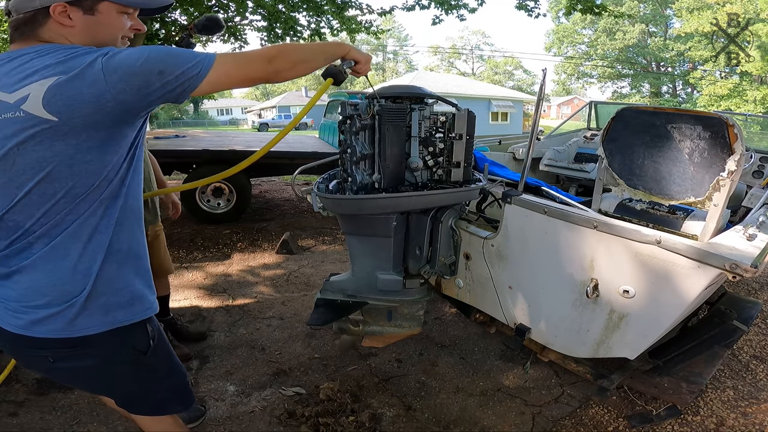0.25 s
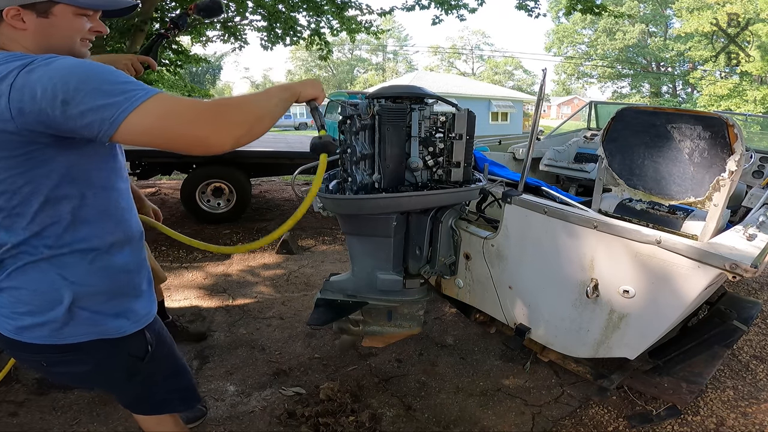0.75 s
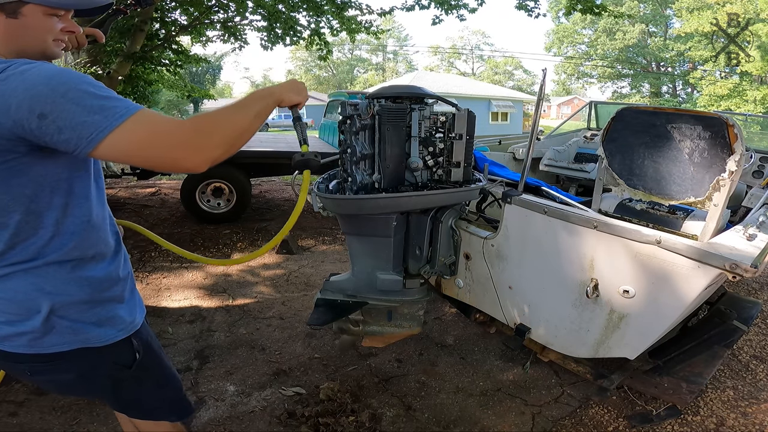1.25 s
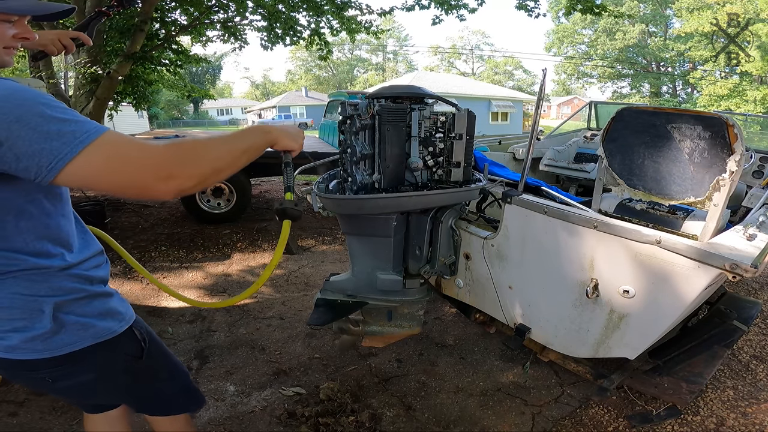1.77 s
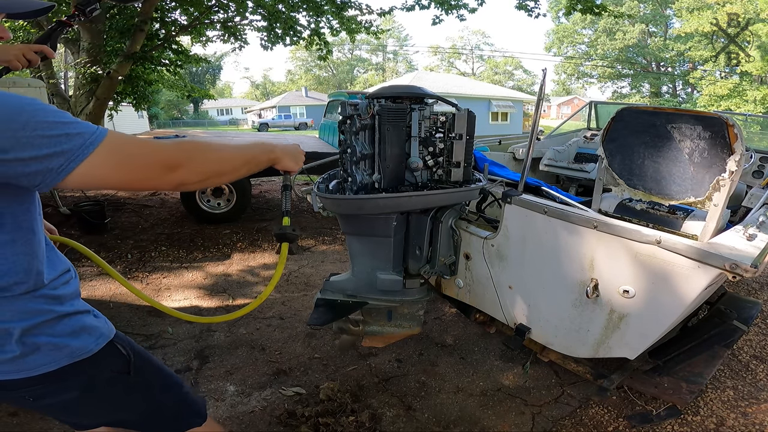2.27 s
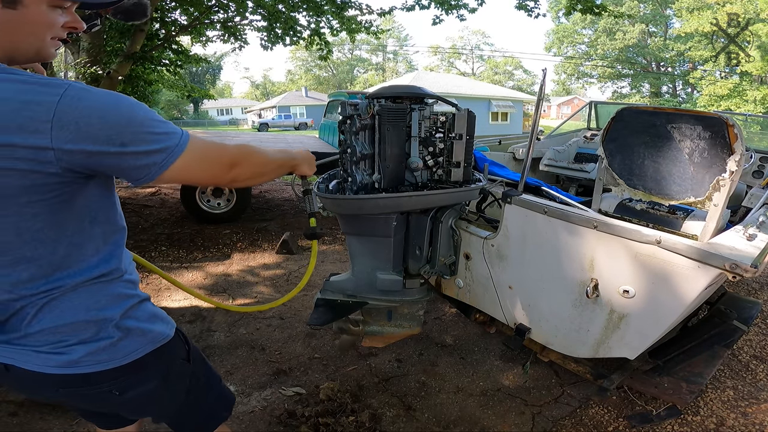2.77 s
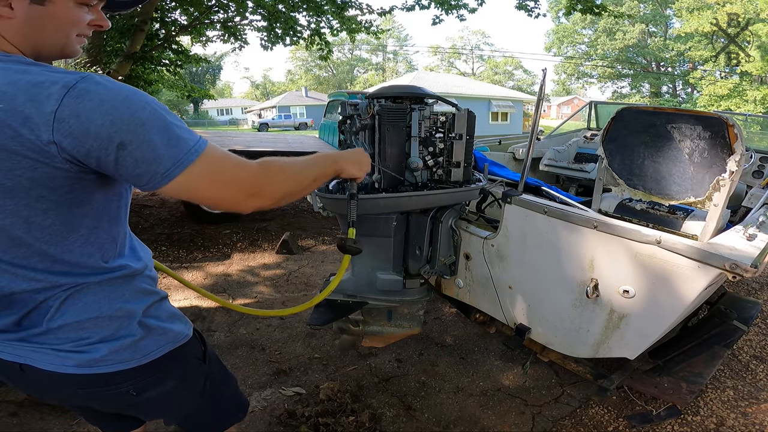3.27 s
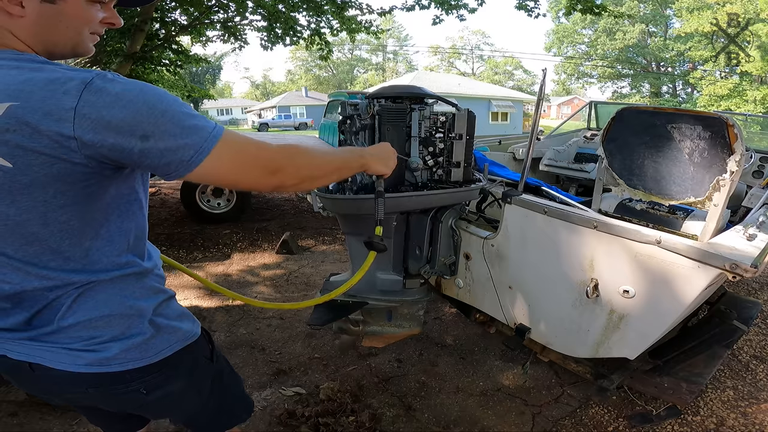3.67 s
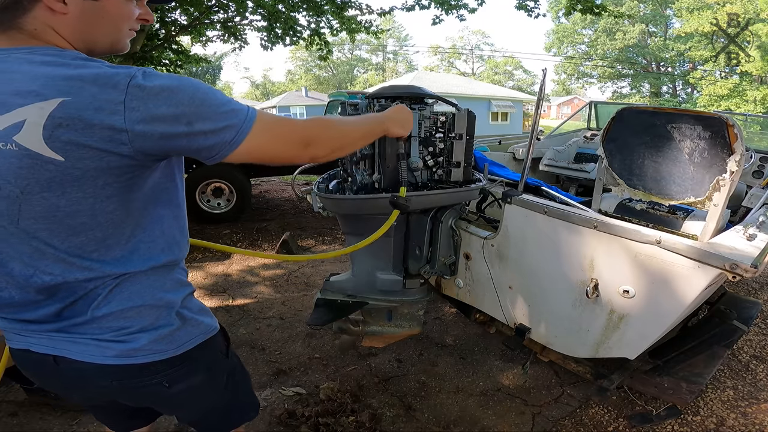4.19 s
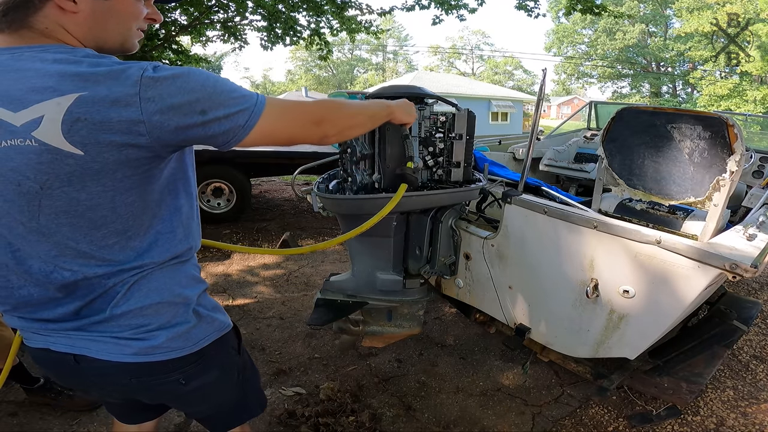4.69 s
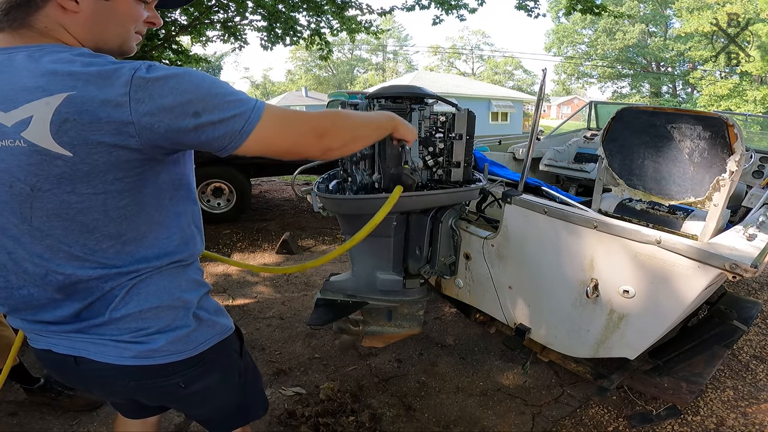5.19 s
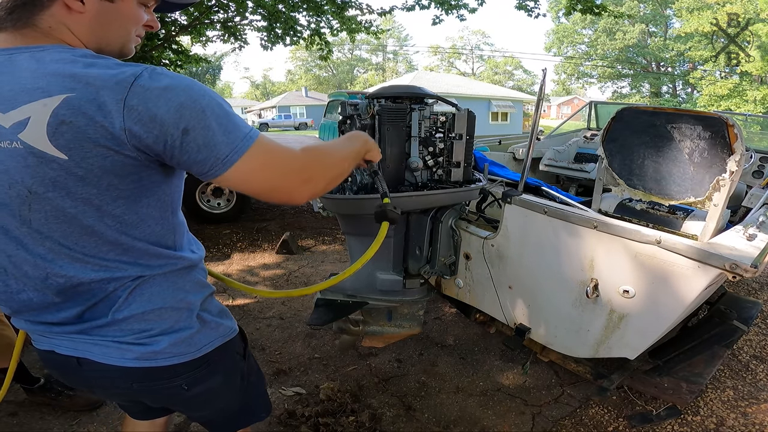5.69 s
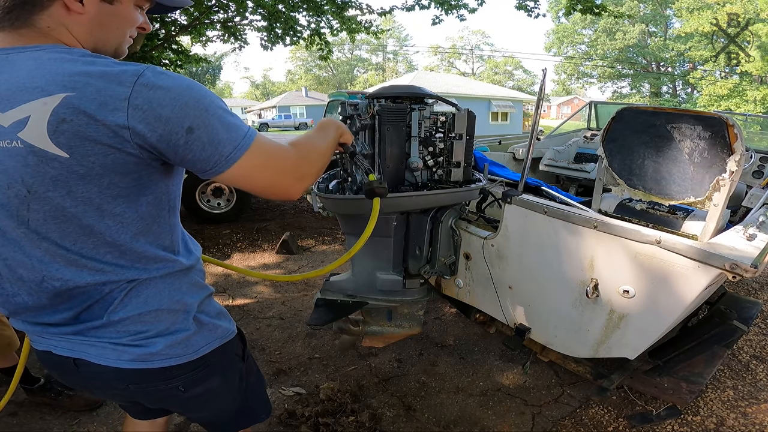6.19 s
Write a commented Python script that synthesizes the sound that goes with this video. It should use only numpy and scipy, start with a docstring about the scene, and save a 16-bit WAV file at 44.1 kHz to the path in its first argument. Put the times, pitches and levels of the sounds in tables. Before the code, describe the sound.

Steady spray of water on a bare engine, outdoors and fairly close. Dense droplets hiss and crackle, with rapid irregular splashes as the jet crosses ribs, recesses and the lower cover. Early sound is light and sizzling; from about two seconds it grows fuller and drummier, later more choppy with little bubbling notes. The level dips briefly when the jet slips off edges. Almost no reverberation, the image centred, with a very faint low background.

```python
"""In a yard, a garden hose sprays an uncovered outboard motor a couple of metres from the microphone.
A dense stream of random drop hits and ringing bubbles is coloured three ways: it hisses on the metal,
washes through the gaps and drums on the hollow lower cover. As the hand sweeps the nozzle, short swells
of coloured stream flare on ribs, gush, thump and gurgle, and narrow bands stand out; the level dips as
the jet slips off. Around this lie a crackling nozzle mist and a faint outdoor rumble."""
import sys
import numpy as np
from scipy import signal
from scipy.fft import rfft, irfft, next_fast_len
from scipy.io import wavfile
from scipy.ndimage import uniform_filter1d, map_coordinates

SR = 44100
rng = np.random.default_rng(int(sys.argv[2]) if len(sys.argv) > 2 else 0)


def digitize_waveform(pressure):
    """Quantize a signal to 16-bit integers and store it at the path in sys.argv[1].

    Rows of a 2-D input are taken as channels; values are limited to [-1, 1].
    """
    field = np.atleast_2d(pressure).T
    bounded = np.clip(field, -1, 1)
    quanta = np.round(bounded * 32767).astype(np.int16)
    wavfile.write(sys.argv[1], SR, quanta)


N = 284445  # samples, about 6.45 s

# In all tables, levels are relative: the colouring of the motor and the microphone comes later.
# The steady jet: (start_s, drumming_on_cover_db, wash_in_gaps_db, hiss_on_metal_db)
JET_LEVELS = [(0, -35, -18.5, -20), (.3, -37.5, -24, -19.5), (.7, -30, -20.5, -20), (1.35, -27, -20, -18),
              (1.65, -22, -26, -19.5), (2.1, -16, -21.5, -21), (2.401, -15.5, -26.5, -21.5),
              (2.7, -12, -24, -20.5), (3.15, -17, -25.5, -19), (3.35, -17, -20, -18.5),
              (3.8, -18.5, -19.5, -19.5), (4.0, -11, -21.5, -21.5), (4.45, -18, -18, -20.5),
              (4.85, -20, -20, -20), (5.15, -17, -20.5, -21), (5.5, -18.5, -23.5, -21),
              (6.1, -18.5, -25, -22.5), (6.45, -20.5, -18, -18.5)]
# The jet flares on a rib of bare metal: (middle_s, length_s, level_db, centre_hz)
RIB_FLARES = [(.16, 0.26, -19.5, 5400), (0.427, 0.12, -14, 5600), (.542, 0.079, -15, 4900),
              (0.66, .043, -14, 5570), (0.837, 0.2, -17, 4940), (1.017, 0.035, -16.5, 4900),
              (1.052, 0.02, -15, 4900), (1.08, 0.015, -16, 4900), (1.114, 0.017, -17, 4900),
              (1.243, 0.12, -15.5, 3480), (1.378, 0.035, -15.5, 4900), (1.452, 0.026, -15, 5000),
              (1.488, 0.016, -15, 5000), (1.59, 0.031, -15.5, 4900), (1.665, 0.026, -14, 5200),
              (1.858, 0.068, -15, 3800), (2.046, 0.072, -21, 4000), (2.161, 0.047, -12, 3180),
              (2.352, 0.039, -11.5, 2920), (2.433, 0.031, -17, 3500), (2.5, 0.047, -17, 3300),
              (2.579, 0.036, -13, 2800), (2.644, 0.034, -15, 4800), (2.757, 0.026, -16, 3820),
              (2.925, 0.022, -19, 3500), (3.01, 0.037, -14.5, 4300), (3.206, 0.03, -14.5, 4300),
              (3.251, 0.031, -13.5, 5000), (3.341, 0.049, -14, 4500), (3.561, 0.027, -15, 3520),
              (3.794, 0.047, -15, 2800), (4.217, 0.017, -15, 4000), (4.34, 0.028, -15, 3800),
              (4.39, .03, -14.5, 2900), (4.473, 0.022, -13, 3300), (4.542, 0.041, -15.5, 3500),
              (4.614, 0.012, -18, 3880), (4.636, .014, -17, 3880), (4.685, .028, -16, 3500),
              (4.751, 0.021, -16, 4300), (4.79, 0.015, -15, 3000), (4.829, 0.028, -14.5, 4020),
              (4.93, 0.051, -13, 3870), (5.065, 0.068, -14.5, 5070), (5.122, .014, -14, 4000),
              (5.157, 0.02, -14.5, 3400), (5.192, 0.028, -14.5, 3600), (5.275, .012, -16, 3800),
              (5.315, 0.018, -17.5, 4200), (5.402, 0.035, -14, 5500), (5.474, 0.027, -14.5, 5540),
              (5.555, 0.02, -17, 4000), (5.6, 0.022, -14.5, 4350), (5.673, 0.018, -13.5, 4470),
              (5.777, 0.048, -16, 4670), (5.833, 0.019, -15, 4140), (5.878, 0.048, -14.5, 4080),
              (5.989, 0.055, -13.5, 5500), (6.095, 0.02, -16.5, 4500), (6.144, 0.011, -16.5, 4500),
              (6.179, 0.018, -20, 4000), (6.337, 0.015, -17.5, 3000), (6.247, 0.06, -16.5, 5000),
              (6.396, 0.055, -14.5, 4900)]
# The jet gushes into a recess: (middle_s, length_s, level_db, centre_hz)
RECESS_GUSHES = [(.367, 0.064, -15.5, 1300), (.508, 0.061, -15.5, 1320), (.735, 0.053, -14.5, 900),
                 (.915, 0.024, -15, 1200), (1.333, .04, -19, 1100), (1.428, 0.036, -17.5, 890),
                 (1.498, 0.016, -14.5, 1520), (1.569, .035, -14.5, 1150), (1.818, 0.023, -13.5, 1100),
                 (1.914, 0.024, -15, 2000), (2.005, 0.026, -13, 600), (2.045, 0.073, -14.5, 1500),
                 (2.255, 0.085, -14, 1600), (2.432, 0.042, -13.5, 1000), (2.531, .025, -16, 1300),
                 (2.814, 0.021, -18, 1400), (2.938, 0.043, -15, 1600), (3.178, 0.057, -14, 900),
                 (3.264, 0.034, -16.5, 1100), (3.4, 0.054, -17.5, 1900), (3.77, .035, -18, 1200),
                 (4.125, 0.019, -12, 1200), (4.275, 0.04, -19, 1200), (4.698, 0.039, -15, 1000),
                 (4.783, 0.014, -12.5, 1400), (5.139, 0.044, -16, 1300), (5.246, 0.015, -9.5, 1000),
                 (5.32, 0.069, -16, 797), (5.488, .027, -15, 750), (5.559, 0.024, -15.5, 700),
                 (5.73, 0.084, -17.5, 1700), (5.915, 0.037, -15.5, 1110), (5.93, 0.054, -13, 448),
                 (5.954, 0.0071, -11.5, 1200), (6.028, 0.017, -14.5, 1000), (6.09, 0.02, -15.5, 1100),
                 (6.147, 0.0078, -14.5, 1000), (6.215, 0.043, -20.5, 895)]
# The jet thumps the lower cover: (middle_s, length_s, level_db)
COVER_THUMPS = [(.335, .02, -16), (.74, .05, -13.5), (1.06, .07, -15), (1.188, 0.017, -10),
                (1.406, 0.025, -6), (1.482, .025, -11), (1.572, 0.034, -13), (1.825, 0.034, -10),
                (2.306, 0.04, -7), (3.08, .05, -10), (3.2, 0.084, -10), (3.43, 0.036, -21),
                (3.884, .026, -14), (4.592, 0.046, -7), (4.73, 0.073, -11), (4.983, 0.024, -5.5),
                (5.07, .04, -14.5), (5.3, .04, -8), (5.41, .025, -15), (6.33, .035, -4.5)]
# Colour of every thump: (centre_hz, spread_octaves)
THUMP_COLOUR = (194, 0.38)
# Narrow bands of the stream stand out, from short notes to long steady ripples:
# (middle_s, length_s, level_db, pitch_hz, spread_octaves)
NARROW_BANDS = [(.16, 0.45, -14, 3800, 0.056), (.16, 0.38, -16, 4300, .04), (.16, 0.47, -12.5, 4700, 0.034),
                (.15, 0.36, -11, 5220, .025), (.15, 0.31, -11.5, 6130, 0.038),
                (.7, 1.44, -19.5, 840, 0.086), (1.05, 0.88, -18.5, 1860, 0.084),
                (.9, 0.9, -13.5, 3620, .055), (1.29, 0.26, -15, 3530, .055), (1.437, .025, -6, 560, 0.1),
                (1.683, .018, -9.5, 3270, .2), (1.86, 0.034, -14, 2800, 0.32),
                (2.85, 0.99, -19, 1060, 0.082), (2.71, 0.069, -9, 430, .35), (2.88, 0.25, -14, 400, .2),
                (3.16, 0.073, -5.5, 416, 0.32), (3.368, .016, -7.5, 1900, .09),
                (3.58, 0.15, -16, 2250, .07), (3.655, 0.055, -7, 2180, 0.065), (3.78, .044, -6, 2200, .07),
                (3.74, 0.18, -17, 2740, .06), (3.885, 0.019, -6, 430, .45), (4.005, 0.018, -5.5, 980, 0.13),
                (4.047, 0.017, -3.5, 2100, 0.12), (4.173, .04, -8.5, 2040, .1), (4.263, .02, -4, 1800, .1),
                (4.613, 0.013, -9, 3900, .25), (4.638, .014, -10, 3900, 0.27),
                (4.82, 0.025, -8, 2200, 0.21), (4.935, 0.05, -13, 2600, 0.33), (5.3, .045, -9, 1880, 0.084),
                (5.745, 0.041, -10, 2250, .14), (5.55, 0.42, -17, 1110, 0.11)]
# The jet slips past an edge: (middle_s, length_s, loss_db); a negative loss is a small rise
EDGE_MISSES = [(.605, 0.023, 3.5), (.98, .025, 3), (1.036, .008, 4.5), (1.097, .011, 2.5),
               (1.146, 0.024, 2.5), (1.399, 0.011, 2.5), (1.476, .015, 3), (1.528, 0.041, 4.8),
               (1.745, 0.08, 5), (1.955, 0.05, 1.5), (2.203, 0.023, 4.5), (2.307, 0.023, 2),
               (2.394, .03, 1.5), (2.467, .018, -0.5), (2.546, .014, 1.5), (2.615, .016, 0.5),
               (2.69, .03, 0.5), (2.87, .058, 2), (2.979, 0.028, 2.5), (3.067, 0.077, 1.5),
               (3.226, .014, 0.5), (3.487, 0.058, 2), (3.72, 0.054, 1.5), (3.858, 0.032, 3.5),
               (4.239, 0.012, 3), (4.365, 0.013, 4), (4.408, .012, 2.5), (4.501, 0.017, 5),
               (4.582, 0.02, 1), (4.626, .009, 3), (4.652, .012, 1.5), (4.72, 0.02, 2), (4.86, .035, 2),
               (4.97, 0.013, 7), (5.138, .014, 3), (5.225, 0.016, 0), (5.265, 0.01, 6.5), (5.44, .024, 1.5),
               (5.517, 0.032, 1), (5.635, 0.022, -1), (5.814, 0.017, 0.5), (6.058, 0.023, 0.5),
               (6.262, 0.012, 4.5), (6.305, 0.016, 4.5)]
# The jet leaves the gaps and the cover, and the low splash thins: (middle_s, length_s, loss_db)
LOW_THINNINGS = [(.12, .06, 1), (.6, .08, 0), (.8, 0.039, 4), (1.245, 0.051, 1), (1.476, .016, 9),
                 (1.63, .055, 7), (1.76, 0.062, 6.5), (1.885, .065, 4.5), (2.17, .047, 3),
                 (3.335, .045, 5.5), (3.81, 0.031, 5), (4.828, 0.067, 4), (4.92, 0.044, 3),
                 (5.105, 0.046, 5), (5.178, .045, 7), (5.41, 0.029, 2), (5.79, 0.029, 8),
                 (6.01, 0.035, 0.5), (6.075, .02, 2), (6.27, .055, 2)]
# Deep among the engine parts, small pockets gurgle as they fill: (start_s, end_s)
GURGLE_TIME = (3.95, 5.3)
# How strongly narrow bands rise and fall, eased later toward the treble: (time_s, depth_db)
PATCH_DEPTH = [(1.3, 1.7), (2.3, 2.5), (3.7, 3), (4.1, 3.5), (5.3, 3), (6.45, 2.4)]
# Broad colour of water striking the motor: (pitch_hz, level_db)
MOTOR_COLOUR = [(30, -41), (65, -20), (110, -22), (170, -16.5), (240, -15), (290, -20), (375, -12.5),
                (530, -10), (900, -5), (1900, -3), (3800, -1.5), (6300, -5), (8000, -9.5), (15500, -34)]
# Hollows of the lower cover and the castings: (pitch_hz, width_hz, level_db)
MOTOR_HOLLOWS = [(349, 39, 1.5), (1100, 76, -33), (1830, 530, -19), (3500, 43, -26), (6160, 110, -31)]
# Slow swing of the nozzle mist, centred and then widened by MIST_GROWS: (time_s, level_db)
MIST_SWING = [(0, -37.5), (.75, -40), (.95, -35.5), (1.1, -42), (1.5, -41.5), (1.75, -46), (1.9, -37.5),
              (3.2, -41), (3.85, -36), (4.9, -38), (6.45, -39.5)]
# The mist spits briefly: (middle_s, length_s, gain_db)
MIST_SPITS = [(.3, .025, 8), (.965, .06, 7), (1.375, .03, 10), (1.46, .025, 16), (1.66, .025, 11),
              (1.85, .025, 10), (2.23, .015, 4), (2.335, .02, 3), (3.5, 0.08, 9), (3.92, .02, 8),
              (4.3, .025, 4), (5.07, .035, 10), (5.195, .02, 9), (5.4, .016, 8), (6.14, .014, 13)]
# Shape of the outdoor rumble: (pitch_hz, level_db)
RUMBLE = [(20, -26), (45, -15), (65, -9), (110, -13), (180, 0.0), (300, -2), (2000, -49)]
# Loose noise between left and right, against the middle: (pitch_hz, level_db)
SIDE_LEVEL = [(100, -28), (700, -33.5), (1400, -60), (5000, -71), (9800, -34), (11000, -23), (11700, -8.5),
              (15500, -3)]
# Treble response of the microphone ports: (pitch_hz, level_db)
PORT_RESPONSE = [(7400, -1), (8200, -6.5), (8900, -10.5), (9000, -25), (9130, -11), (9500, -1),
                 (10000, 3.5), (10600, 3.5), (11200, 9), (11800, -1), (12500, 3.5), (14000, -1),
                 (15500, -3)]
# Added to the right port and taken from the left: (pitch_hz, level_db)
PORT_LEAN = [(11000, 0), (11800, 2.5), (12600, -1), (13700, 5.5), (15000, 4)]

FLARE_OCTAVES, GUSH_OCTAVES, GURGLE_OCTAVES = 0.65, 0.77, 0.093  # how wide each colour spreads
SHIELD_DB = 2.5  # a rib that takes the jet keeps it from the gaps and the cover
MISS_EXTRA = 0.11  # in a miss the wash and drumming lose this share more than the hiss
GURGLE_PER_S, GURGLE_LENGTH_S, GURGLE_DB = 22, 0.021, -13
GURGLE_HZ, GURGLE_SCATTER_OCTAVES = 1920, 0.51  # middle pitch and its random scatter
HULL_S, HULL_DRIFT, HULL_DB = .002, 0.212, -18  # hull echo: typical delay, random drift (share), level
NOZZLE_DB, NOZZLE_HZ = -29.5, 12000  # fine hiss of the nozzle itself
MIST_GROWS = 2.7  # how far the slow mist swing is widened
TOP_HZ = 15780  # nothing above this pitch is kept


def jet():
    """The steady stream drums on the cover, washes through the gaps and hisses on bare metal."""
    time_s, *levels = np.transpose(JET_LEVELS)
    drum_db, wash_db, hiss_db = [np.interp(np.arange(N) / SR, time_s, level) for level in levels]

    drum_drops = patter(drop_rate=2500, size_db=0, bubble_db=-9, clump_db=-0.5)
    drum = filtered(drum_drops, lambda hz: bell(hz, 404, 0.75) + amp(-18.5) * bell(hz, 90, 0.97))
    wash_drops = patter(drop_rate=6000, size_db=1.5, bubble_db=-7, clump_db=1.0)
    wash = filtered(wash_drops, lambda hz: bell(hz, 1310, 1.0))
    hiss_drops = patter(drop_rate=20000, size_db=-1.0, bubble_db=-12.5, clump_db=0.8)
    hiss = filtered(hiss_drops, lambda hz: bell(hz, 5650, 0.94))

    rib_shields = [(middle_s, length_s, SHIELD_DB) for middle_s, length_s, *_ in RIB_FLARES]
    loss_db = crossed(rib_shields) + MISS_EXTRA * crossed(EDGE_MISSES) + crossed(LOW_THINNINGS)
    reach_db = loss_db.mean() - loss_db  # centred, so the average level in dB stays put

    drumming = amp(drum_db + reach_db + 1.33 * wobble(30, N)) * drum
    washing = amp(wash_db + reach_db + 1.2 * wobble(30, N)) * wash
    hissing = amp(hiss_db + 0.88 * wobble(30, N)) * hiss
    return drumming + washing + hissing


def splashes():
    """Pieces of the stream swell up, each in its own colour and with a close echo."""
    stream = patter(drop_rate=9000, size_db=0, bubble_db=-8, clump_db=0.66)
    kinds = [(RIB_FLARES, [FLARE_OCTAVES]), (RECESS_GUSHES, [GUSH_OCTAVES]),
             (COVER_THUMPS, THUMP_COLOUR), (NARROW_BANDS, [])]
    crossings = [(*row, *tone) for table, tone in kinds for row in table] + gurgles()
    luck = rng.random((len(crossings), 2))
    out = np.zeros(N)
    for (middle_s, length_s, level_db, centre_hz, octaves), (place, depth) in zip(crossings, luck):
        n = around(middle_s, length_s)
        piece = stream[(n + int(place * N)) % N]  # a random stretch of the stream
        water = glance(piece, 0.00068 + .003 * depth, echo_db=-6)
        shape = swell(n / SR, middle_s, length_s)
        colour = lambda hz: bell(hz, centre_hz, octaves)
        # A narrow colour lets less power through, so it is quieter
        share = np.mean(colour(np.linspace(0, SR / 2, 4096)) ** 2)
        loudness = np.sqrt(share * np.mean(shape ** 2))
        out[n] += amp(level_db) * unit(shape * filtered(water, colour)) * loudness
    return out


def gurgles():
    """Each filling pocket sounds one short, narrow note at a scattered time and pitch."""
    slots = np.arange(*GURGLE_TIME, 1 / GURGLE_PER_S)
    late, high = np.clip(rng.standard_normal((len(slots), 2)), -2, 2).T
    middles_s = slots + .5 * late / GURGLE_PER_S
    pitches_hz = GURGLE_HZ * 2 ** (GURGLE_SCATTER_OCTAVES * high)
    return [(middle_s, GURGLE_LENGTH_S, GURGLE_DB, pitch_hz, GURGLE_OCTAVES)
            for middle_s, pitch_hz in zip(middles_s, pitches_hz)]


def contact():
    """All water landing on the motor: the hull echo's delay drifts, and the level changes at each miss."""
    delay_s = HULL_S * np.exp(HULL_DRIFT * wobble(2, N))
    stream = glance(jet(), delay_s, HULL_DB)
    return amp(-crossed(EDGE_MISSES)) * (stream + splashes())


def patches(x):
    """Narrow bands of all the water rise and fall at random; the fine hiss stays smoother."""
    _, time_s, spectrum = signal.stft(x, SR, nperseg=1024)
    rows, frames = np.indices(spectrum.shape)
    noise = rng.standard_normal(spectrum.shape)
    field = map_coordinates(noise, [np.sqrt(rows) * 10, frames / 3], mode="mirror")
    depth_db = np.interp(time_s, *np.transpose(PATCH_DEPTH))
    gain = amp(depth_db * field / (1 + rows / 350))
    gain /= np.sqrt(uniform_filter1d(gain ** 2, size=24, axis=0))  # even out across neighbouring pitches
    return signal.istft(spectrum * gain, nperseg=1024)[1][:N]


def motor(hz):
    """The broad colour of water on the motor, with hollows that each boost the pitches near their own."""
    rings = sum(amp(db) * 1j * hz * width / (centre * centre - hz * hz + 1j * hz * width)
                for centre, width, db in MOTOR_HOLLOWS)
    gain = amp(along(MOTOR_COLOUR, hz)) * (1 + rings)
    return gain / np.sqrt(np.mean(np.abs(gain) ** 2))


def nozzle():
    """Fine mist leaves the nozzle as a crackling hiss that swells, fades and spits."""
    time_s, level_db = np.transpose(MIST_SWING)
    slow_db = MIST_GROWS * np.interp(np.arange(N) / SR, time_s, level_db - level_db.mean())
    drops = patter(drop_rate=3500, size_db=2.0, bubble_db=-22, clump_db=2.5)
    mist = filtered(drops, lambda hz: bell(hz, NOZZLE_HZ, 0.54))
    return amp(NOZZLE_DB + slow_db + crossed(MIST_SPITS) + 1.9 * wobble(35, N)) * mist


def yard():
    """A faint outdoor rumble: random noise kept mostly to the low pitches."""
    air = filtered(rng.standard_normal(N), lambda hz: amp(along(RUMBLE, hz)))
    return amp(-54.0) * unit(air)


def patter(drop_rate, size_db, bubble_db, clump_db):
    """Sharp drop hits of many strengths with bubbles among them; the level wavers as the jet clumps."""
    hit = rng.random(N) < drop_rate / SR
    drops = unit(hit * rng.standard_normal(N) * amp(size_db * rng.standard_normal(N)))
    pockets = bubbles(rate=500, middle_hz=2610, scatter=0.663, cycles=5.8, size_db=1.0)
    water = drops + amp(bubble_db) * pockets
    return unit(water * amp(clump_db * wobble(150, N)))


def bubbles(rate, middle_hz, scatter, cycles, size_db):
    """Air pockets that ring for a few cycles, rising in pitch at first as they open."""
    count = int(rate * N / SR)
    draw = rng.standard_normal((count, 3))  # random pitch, life and size
    start = rng.integers(0, N, count)
    hz = np.clip(middle_hz * np.exp(scatter * draw[:, :1]), 250, 9000)
    life_s = cycles * np.exp(.5 * draw[:, 1:2]) / hz
    t = np.arange(SR // 50) / SR
    age = t / life_s
    tone = np.sin(2 * np.pi * hz * t * (1 + 0.036 * np.minimum(age, 2)))
    ring = tone * np.exp(-age) * (1 - np.exp(-6 * age))  # quick attack, then decay
    ring *= amp(size_db * np.clip(draw[:, 2:], -2, 2)) * hz ** 1.02
    ring *= 1 - t / t[-1]  # reach silence at the end
    places = start[:, None] + np.arange(len(t))
    return unit(np.bincount(places.ravel(), ring.ravel())[:N])


def glance(x, delay_s, echo_db):
    """A nearby surface repeats the sound a moment later and ripples its spectrum."""
    n = np.arange(len(x))
    echo = map_coordinates(x, [n - delay_s * SR], order=3)
    return (x + amp(echo_db) * echo) / np.hypot(1, amp(echo_db))


def swell(t, middle_s, length_s):
    """The jet crosses a part of the motor; it leaves an edge faster than it arrives."""
    phase = 2 * (t - middle_s) / length_s
    return np.exp(-.5 * np.abs(phase) ** np.where(phase < 0, 3.2, 6))


def around(middle_s, length_s):
    """The samples that a crossing touches."""
    first = max(0, int((middle_s - 2 * length_s) * SR))
    last = min(N, int((middle_s + 2 * length_s) * SR))
    return np.arange(first, last)


def crossed(rows):
    """A level curve in dB that swells at each (middle_s, length_s, change_db) crossing."""
    total_db = np.zeros(N)
    for middle_s, length_s, change_db in rows:
        n = around(middle_s, length_s)
        total_db[n] += change_db * swell(n / SR, middle_s, length_s)
    return total_db


def amp(db):
    """Turn decibels into a plain multiplier."""
    return 10 ** (np.asarray(db) / 20)


def unit(x):
    """Bring a sound to an average (RMS) strength of 1."""
    return x / np.sqrt(np.mean(x ** 2) + 1e-20)


def along(points, hz):
    """Read a curve of (pitch_hz, value) points on a log axis."""
    point_hz, value = np.transpose(points)
    return np.interp(np.log(hz + 1), np.log(point_hz + 1), value)


def wobble(rate, size):
    """A smooth random curve with this many knots a second."""
    knots = rng.standard_normal(int(size * rate / SR) + 4)
    return map_coordinates(knots, [np.arange(size) * rate / SR])


def filtered(x, response):
    """Colour a sound by multiplying its spectrum by a response."""
    size = x.shape[-1]
    padded = next_fast_len(size + 4096)  # spare room for the filter's tail
    return irfft(rfft(x, padded) * response(np.fft.rfftfreq(padded, 1 / SR)), padded)[..., :size]


def bell(hz, centre_hz, octaves):
    """A smooth hump of gain on a log-frequency axis."""
    return np.exp(-(np.log2((hz + 1) / centre_hz) / octaves / 2) ** 2)


def scene():
    """Nearly mono water, with loose random noise added between left and right, mainly in the top treble."""
    water = filtered(patches(contact() + nozzle()), motor) + yard()
    fizz = filtered(water, lambda hz: bell(hz, 11000, 0.28))
    strength = np.sqrt(np.abs(uniform_filter1d(fizz ** 2, size=256)))
    # Fresh noise follows the strength of the fizz
    loose = unit(strength * filtered(rng.standard_normal(N), motor)) * np.std(water)
    side = filtered(loose, lambda hz: amp(along(SIDE_LEVEL, hz)))
    return np.array([water + side, water - side])


def record(dry):
    """The ports shape the treble, mostly brighter at right; tall peaks are rounded and the top is cut."""
    lean_db = lambda hz: np.array([[-1], [1]]) * along(PORT_LEAN, hz)
    heard = filtered(dry, lambda hz: amp(along(PORT_RESPONSE, hz) + lean_db(hz)))
    rounded = heard / (1 + np.abs(heard / .72) ** 8) ** (1 / 8)
    return filtered(rounded, lambda hz: hz < TOP_HZ)


dry = scene()
out = record(dry)
digitize_waveform(out)
```